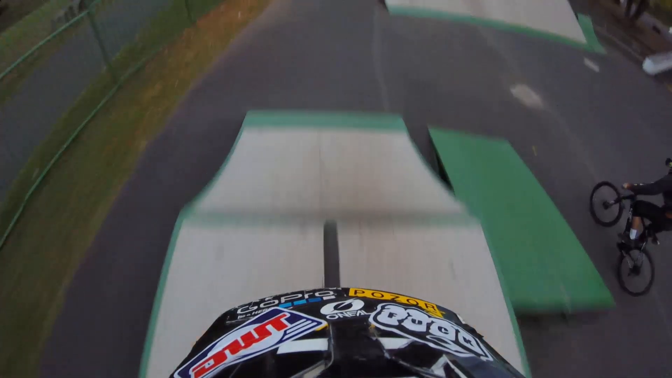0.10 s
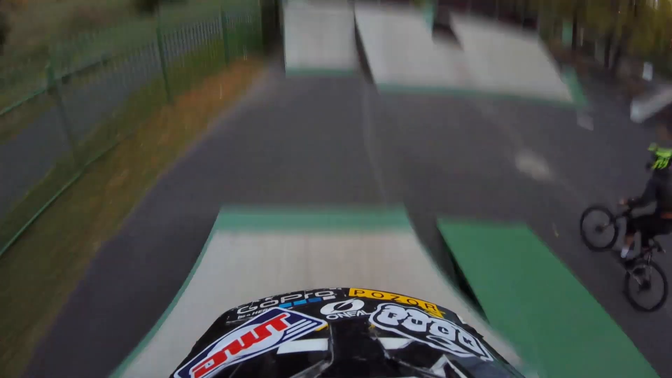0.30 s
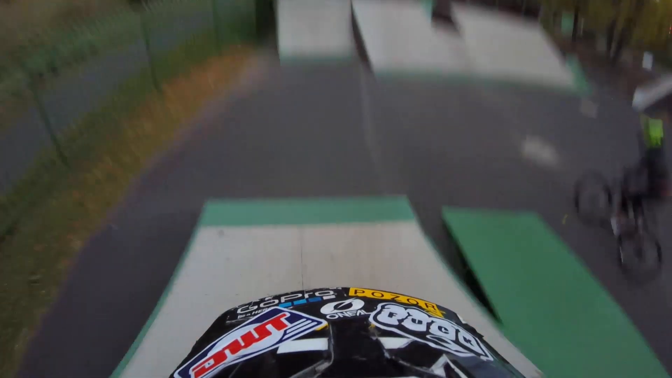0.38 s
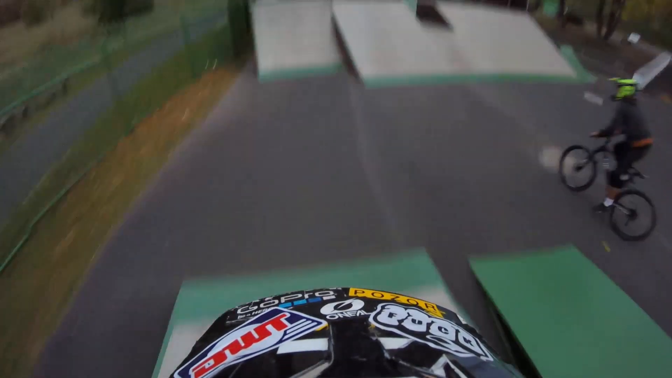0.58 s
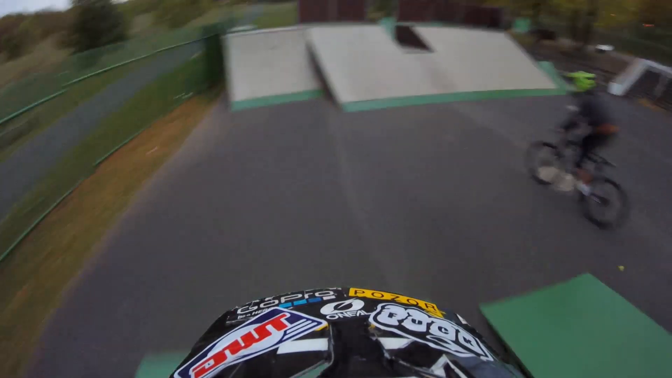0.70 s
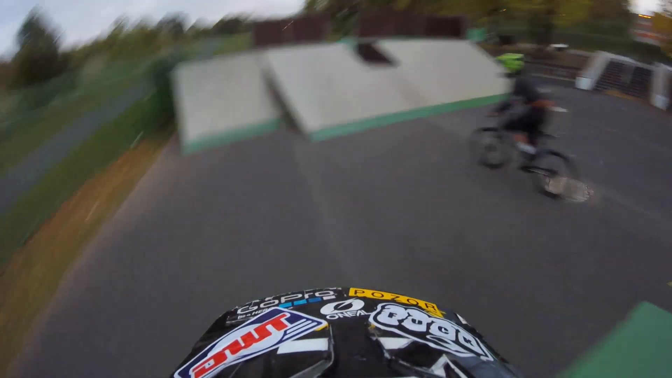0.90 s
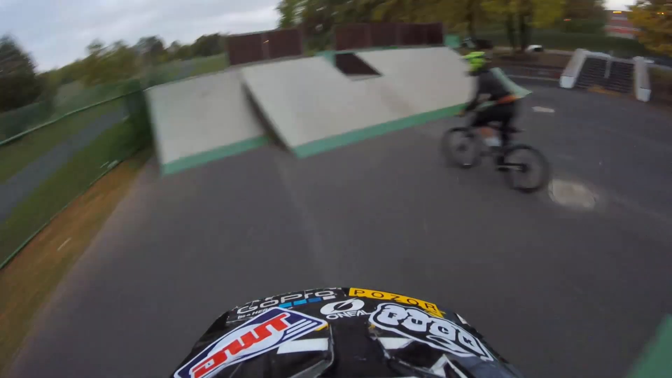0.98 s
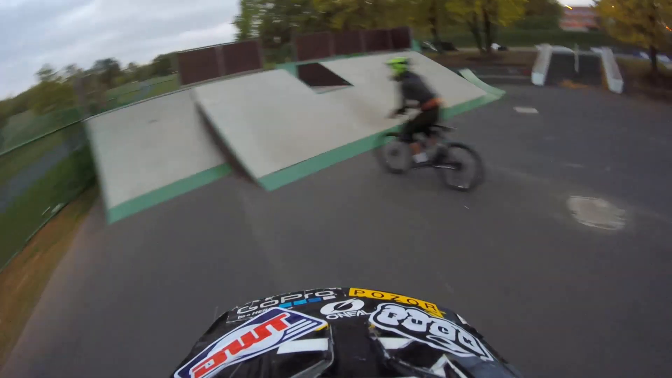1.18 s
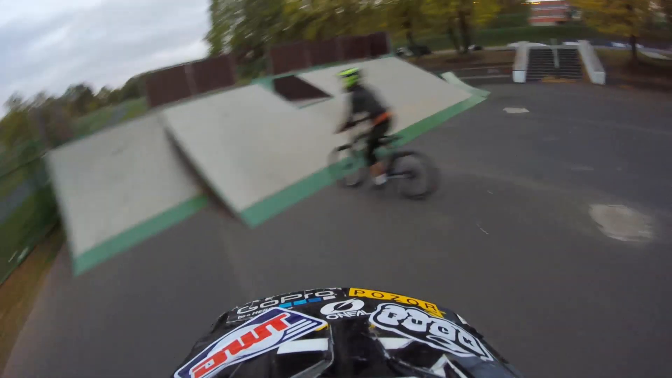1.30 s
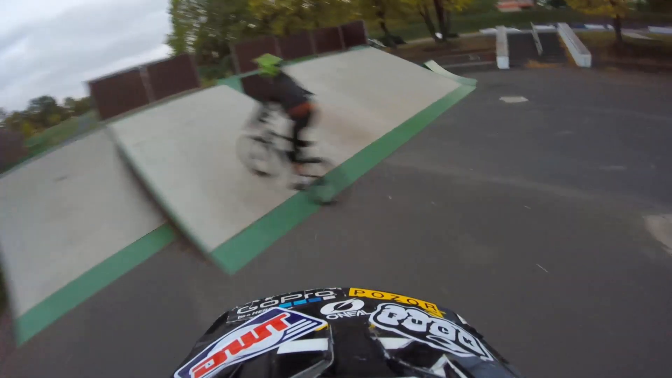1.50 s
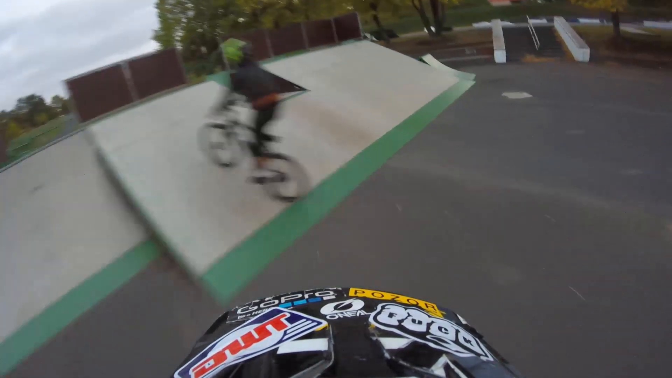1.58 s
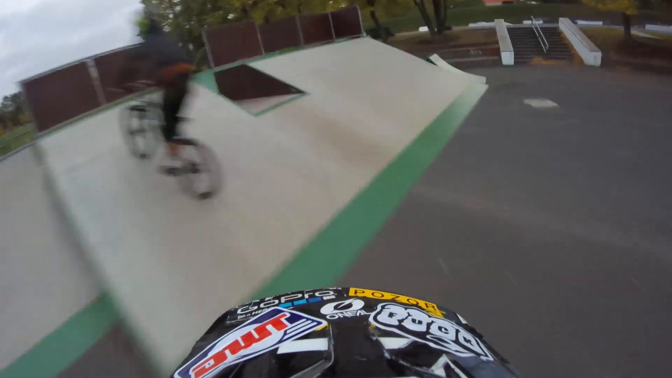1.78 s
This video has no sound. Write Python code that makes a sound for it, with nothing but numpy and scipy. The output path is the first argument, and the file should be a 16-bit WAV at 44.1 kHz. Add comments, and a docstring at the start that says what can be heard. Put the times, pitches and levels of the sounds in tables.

```python
"""The wheels of a bike dropping over ramp edges jolt a helmet camera: single heavily damped low swings.
The same ride knocks the frame and boards: decaying sine modes and bands of noise; a chain clinks early and late.
Knobbly tyres hiss on the asphalt as band-passed noise with grit and hum as an unevenly modulated tone.
Wind is noise shaped in spectrum and level. A closed case, a bank of resonances, colours the knocks' cracks,
the clinks and the tyre hiss."""
import sys
import numpy as np
from scipy import signal
from scipy.fft import rfft, irfft
from scipy.io import wavfile
from scipy.ndimage import uniform_filter1d

SR = 44100
rng = np.random.default_rng(int(sys.argv[2]) if len(sys.argv) > 2 else 0)


def transcribe(signal):
    """Save signal, clipped to [-1, 1], as a 16-bit WAV file at the path in sys.argv[1]."""
    frames = np.atleast_2d(signal).T
    limited = np.clip(frames, -1, 1)
    pcm = np.round(limited * 32767).astype(np.int16)
    wavfile.write(sys.argv[1], SR, pcm)


N = 79380
T = np.arange(N) / SR  # time in seconds

# Wind buffeting the case. Each row: time in seconds, level in dB.
WIND_LEVEL = [(0, -38.5), (.1, -53), (.19, -38), (.38, -28.5), (.47, -36), (.55, -45), (.66, -34),
              (.78, -39), (.95, -28.5), (1.05, -43), (1.15, -45.5), (1.35, -46.5), (1.55, -41), (1.7, -44),
              (1.8, -37.5)]
# Spectrum of the buffeting. Each row: frequency in Hz, relative density in dB per Hz.
WIND_SPECTRUM = [(10, 3), (20, 8.5), (35, -15), (60, -3), (100, -18), (125, -23), (200, -69)]
# Spectrum of the rush of air. Each row: frequency in Hz, relative density in dB per Hz before the dip.
RUSH_SPECTRUM = [(125, -1.5), (280, -2.5), (330, -5.5), (1220, -10), (1520, -4.5), (1980, -12), (2570, -10),
                 (2910, -17), (5000, -25), (9000, -30), (12500, -37.5), (14600, -42), (15600, -47)]
# Level of the rush of air. Each row: time in seconds, level in dB.
RUSH_LEVEL = [(0, -57), (.6, -56.5), (1.1, -56.5), (1.55, -55), (1.8, -57)]
RUSH_DIP_DB = 4  # the rush is thinner in the upper middle
BUFFET_FLICKER_DB, RUSH_FLICKER_DB = 1.7, 1.2

# Tread hum through the frame. Each row: time in seconds, level in dB.
HUM_LEVEL = [(0, -62), (.4, -54), (.52, -50), (.6, -63.5), (1.14, -58.5), (1.2, -45.5), (1.27, -39),
             (1.3, -77), (1.33, -40), (1.38, -48.5), (1.43, -46), (1.52, -48.5), (1.56, -51), (1.62, -45),
             (1.73, -51), (1.75, -58), (1.8, -43)]
HUM_HZ, WOBBLE_RATE_HZ, WOBBLE_DEPTH = 90.44, 14, 0.35

# Hiss of the rolling tyres. Each row: time in seconds, level in dB before the case.
HISS_LEVEL = [(0, -86), (.15, -67), (.26, -51), (.34, -56), (.37, -60), (.44, -51.5), (.485, -68),
              (.55, -58), (.7, -64.5), (.8, -52.5), (1.0, -54), (1.25, -54.5), (1.43, -51.5), (1.5, -46.5),
              (1.57, -47), (1.66, -50.5), (1.78, -54), (1.8, -53)]
HISS_HZ, HISS_WIDTH_HZ = 2060, 1520
GRIT_PER_S, GRIT_DB, HISS_FLICKER_DB = 1500, -5, 1.5

# Knocks of wheels and frame. Each row: start in seconds, rattle level in dB, centre in Hz,
# rattle t60 in seconds, level of the wooden thud in dB, level of the blow in dB.
# The rattle and the blow are given before the case.
KNOCKS = [(0.1615, -47.5, 3230, 0.11, -51, -40), (.175, -46.5, 1470, 0.077, -48.5, -45),
          (0.2164, -31, 2327, 0.073, -49, -24), (.232, -44.5, 2780, 0.027, -50.5, -54),
          (0.242, -41.5, 2200, 0.064, -69, -54), (0.332, -50, 1530, 0.096, -64, -59),
          (0.4964, -49, 2950, 0.21, -75, -41.5), (0.509, -48.5, 1960, .2, -73, -47),
          (0.626, -61, 1460, 0.042, -62, -47), (0.8644, -45, 1560, 0.11, -46.5, -30),
          (1.391, -60, 1336, 0.36, -61, -43), (1.4437, -46, 3180, .1, -57, -34),
          (1.459, -46.5, 2320, 0.13, -62, -59), (1.535, -42, 2180, .1, -53, -35.5),
          (1.549, -45, 1520, 0.11, -66, -32), (1.5885, -42, 3620, 0.22, -54, -39.5),
          (1.593, -41.5, 1460, 0.1, -60, -58), (1.6045, -46, 1500, 0.089, -60, -35.5),
          (1.619, -48, 1450, 0.19, -61, -56)]
# Partials of a blow. Each row: multiple of the knock's centre, level in dB relative to the blow.
BLOW_PARTIALS = [(1, 0.5), (1.25, -8.5), (1.55, -7), (.68, -8.5)]
# Modes of the ramp boards. Each row: frequency in Hz, level in dB relative to the thud, t60 in seconds.
BOARD_MODES = [(146, 10.5, 0.026), (214, 2, 0.094), (317, 0.5, 0.07), (373, -5, 0.066)]
BLOW_T60_S, RATTLE_RELATIVE_WIDTH, EDGE_DB = 0.022, 0.56, -18

# Clinks of the chain. Each row: start in seconds, level in dB before the case, t60 in seconds,
# level of the airy top in dB.
CLINKS = [(0.181, -45, 0.012, -72), (0.217, -50, 0.046, -55.5), (.2325, -54, 0.011, -69),
          (.868, -47.5, .02, -68), (1.4434, -33, 0.031, -63), (1.456, -43, 0.029, -72),
          (1.578, -41, 0.04, -70), (1.586, -41, 0.052, -68), (1.596, -63, 0.041, -78),
          (1.6025, -29, 0.036, -62.5), (1.617, -51, 0.037, -64)]
CLINK_HZ, CLINK_WIDTH_HZ = 5650, 3600
JINGLE_HZ, JINGLE_WIDTH_HZ, JINGLE_DB, JINGLE_T60_S = 6250, 700, -22.5, 0.39
CLINK_AIR_HZ, CLINK_AIR_WIDTH_HZ = 10100, 9000

# Jolts carried through bike and rider into the helmet. Each row: middle of the push in seconds,
# level in dB before the mount, length of the push in seconds, signed direction factor.
JOLTS = [(0.21, -26.5, 0.013, 1), (0.2543, -11, 0.015, 0.93), (0.2855, -15, 0.014, 0.7),
         (0.346, -18, .024, -1.48), (0.838, -24.5, 0.022, 0.79), (.8655, -9, 0.0043, 0.89),
         (0.879, -18.5, 0.032, -1.22), (.898, -15, 0.0077, 0.95), (0.926, -29, 0.012, -0.6)]
MOUNT_HZ, MOUNT_WIDTH_HZ, MOUNT_TOP_HZ = 35.2, 53, 110.4

# Resonances of the case. Each row: frequency in Hz, width in Hz, relative level in dB.
CASE_MODES = [(1426, 218, -2), (2057, 314, -5.5), (2500, 486, -6), (3360, 132, -2.5), (3776, 238, -10),
              (4970, 310, -14.5), (5345, 900, -17.5), (6310, 680, -8.5), (8180, 290, -11.5)]
CASE_GAIN, CASE_LEAK_DB = 1.48, -21

TOP_HZ = 15500


def amp(db):
    """Level law: amplitude is ten to the power of dB / 20."""
    return 10 ** (np.asarray(db) / 20)


def curve(rows):
    """Linear interpolation: levels between the given times."""
    rows = np.array(rows, float)
    return np.interp(T, rows[:, 0], rows[:, 1])


def unit(x):
    """Normalisation: root mean square of 1."""
    return x / np.sqrt(np.mean(x ** 2))


def band(x, hz, width_hz):
    """Two-pole resonance: unit gain at the centre."""
    b, a = signal.iirpeak(hz, hz / width_hz, fs=SR)
    return signal.lfilter(b, a, x)


def coloured(points):
    """Spectral shaping: white noise weighted by a curve of dB over log frequency."""
    p = np.array(points, float)
    hz = np.arange(N // 2 + 1) * SR / N + 1e-3  # the offset avoids log(0)
    gain_db = np.interp(np.log(hz), np.log(p[:, 0]), p[:, 1])
    return unit(irfft(rfft(rng.standard_normal(N)) * amp(gain_db), N))


def walk(rate_hz):
    """Slow random modulation: random levels joined by straight slopes, spread near 1."""
    hold = int(SR / rate_hz)
    steps = np.repeat(rng.standard_normal(N // hold + 1), hold)
    return unit(uniform_filter1d(steps, hold))[:N]


def dying(t0, db, t60):
    """Exponential decay: a fast onset at t0, then a fall of 60 dB per t60 (at least 5 ms)."""
    age = T - t0
    onset = np.clip(age / 0.00057, 0, 1)
    return amp(db - 60 * np.maximum(age, 0) / max(t60, .005)) * onset


def ring(t0, db, hz, t60):
    """Free vibration: one struck mode is a decaying sine."""
    return dying(t0, db, t60) * np.sin(2 * np.pi * hz * (T - t0))


def wind():
    """Turbulent pressure: fluctuating low-frequency noise beneath a faint broadband rush."""
    rush_points = [(20, -55), (90, -40)]
    for hz, db in RUSH_SPECTRUM:
        rush_points.append((hz, db - RUSH_DIP_DB * (1100 < hz < 4500)))
    rush = coloured(rush_points)
    buffet_gain = amp(curve(WIND_LEVEL) + BUFFET_FLICKER_DB * walk(7.4))
    rush_gain = amp(curve(RUSH_LEVEL) + RUSH_FLICKER_DB * walk(13.6))
    return buffet_gain * coloured(WIND_SPECTRUM) + rush_gain * rush


def tread_hum():
    """Quadrature modulation: knobs beating unevenly give a low tone of wavering amplitude and phase."""
    window = int(SR / WOBBLE_RATE_HZ)
    in_phase, quadrature = [WOBBLE_DEPTH * unit(uniform_filter1d(rng.standard_normal(N), window))
                            for _ in range(2)]
    turn = 2 * np.pi * HUM_HZ * T
    tone = (1 + in_phase) * np.sin(turn) + quadrature * np.cos(turn)
    return amp(curve(HUM_LEVEL)) * unit(tone)


def tyres():
    """Friction noise: flickering random rubbing and scattered grit impulses, band-passed twice."""
    hits = rng.random(N) < GRIT_PER_S / SR
    grit = hits * rng.standard_normal(N) * amp(2 * rng.exponential(size=N))
    rub = rng.standard_normal(N) * amp(HISS_FLICKER_DB * walk(25.14))
    rub = rub + amp(GRIT_DB) * unit(grit)
    hiss = band(band(rub, HISS_HZ, HISS_WIDTH_HZ), HISS_HZ, 1.9 * HISS_WIDTH_HZ)
    return amp(curve(HISS_LEVEL)) * unit(hiss)


def knocks():
    """Impact excitation: a blow rings partials, rattles in a noise band and excites the board modes."""
    noise = rng.standard_normal(N)
    crack, thud = np.zeros(N), np.zeros(N)
    for t, rattle_db, centre_hz, t60, thud_db, blow_db in KNOCKS:
        for multiple, part_db in BLOW_PARTIALS:
            crack += ring(t, blow_db + part_db, multiple * centre_hz, BLOW_T60_S)
        rattle = band(noise, centre_hz, RATTLE_RELATIVE_WIDTH * centre_hz)
        rattle = band(rattle, centre_hz, 2 * centre_hz)
        crack += dying(t, rattle_db, t60) * unit(rattle)
        crack += dying(t, rattle_db + EDGE_DB, 0.17 * t60) * noise  # short bright edge
        for k, (hz, mode_db, mode_t60) in enumerate(BOARD_MODES):
            thud += (-1) ** k * ring(t, thud_db + mode_db, hz, mode_t60)
    return crack, thud


def chain():
    """Damped impacts of metal: short bright noise bands, a longer narrow jingle and an airy top."""
    noise = rng.standard_normal(N)
    clink_env = sum(dying(t, db, t60) for t, db, t60, _ in CLINKS)
    air_env = sum(dying(t, air_db, t60) for t, _, t60, air_db in CLINKS)
    jingle_env = sum(dying(t, db + JINGLE_DB, JINGLE_T60_S) for t, db, _, _ in CLINKS)
    clink = unit(band(noise, CLINK_HZ, CLINK_WIDTH_HZ)) * clink_env
    jingle = unit(band(noise, JINGLE_HZ, JINGLE_WIDTH_HZ)) * jingle_env
    air = unit(band(noise, CLINK_AIR_HZ, CLINK_AIR_WIDTH_HZ)) * air_env
    return clink + jingle, air


def jolts():
    """Damped oscillator: smooth pushes swing the helmet mount, and padding blocks fast motion."""
    push = np.zeros(N)
    for t, db, length, direction in JOLTS:
        phase = np.pi * np.clip((T - t) / length, -.5, .5)
        push += direction * amp(db) * np.cos(phase) ** 2
    swing = 1.96 * band(push, MOUNT_HZ, MOUNT_WIDTH_HZ)
    padding = signal.butter(6, MOUNT_TOP_HZ, fs=SR, output="sos")
    return signal.sosfiltfilt(padding, swing)


def through_case(x):
    """Modal transmission: the closed case passes its own resonances and a little of the rest."""
    modes = sum((-1) ** k * amp(db) * band(x, hz, width_hz)
                for k, (hz, width_hz, db) in enumerate(CASE_MODES))
    return CASE_GAIN * modes + amp(CASE_LEAK_DB) * x


def scene():
    """Superposition: sounds coloured by the case add to those that bypass its resonances."""
    crack, thud = knocks()
    clink, clink_air = chain()
    cased = through_case(crack + clink + tyres())
    mix = cased + clink_air + thud + jolts() + tread_hum() + wind()
    return mix[None]


def record(dry):
    """Band limiting: the camera cuts the top with a steep elliptic low-pass."""
    low_pass = signal.ellip(10, .2, 80, TOP_HZ, fs=SR, output="sos")
    return signal.sosfilt(low_pass, dry)


dry = scene()
out = record(dry)
transcribe(out)
```